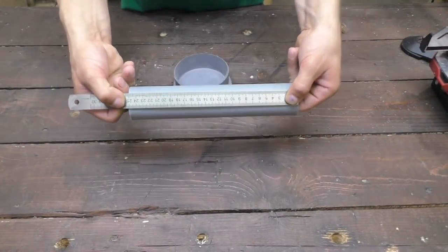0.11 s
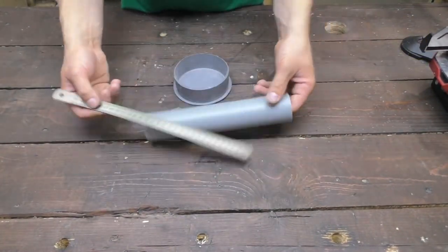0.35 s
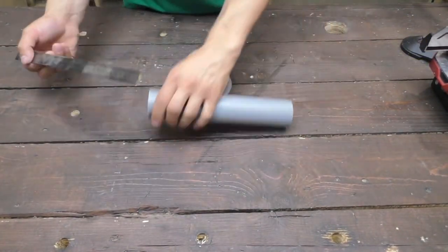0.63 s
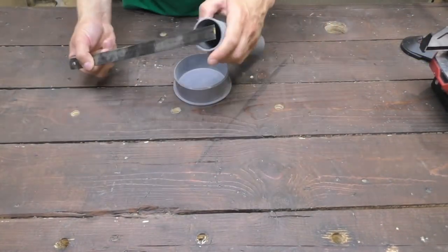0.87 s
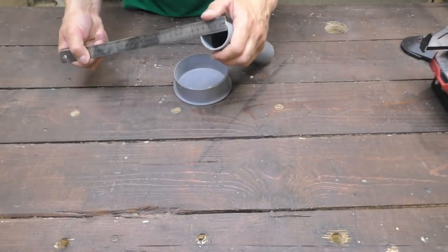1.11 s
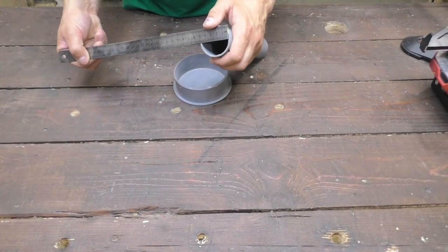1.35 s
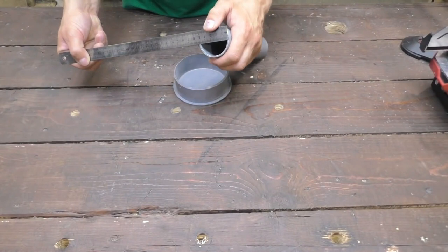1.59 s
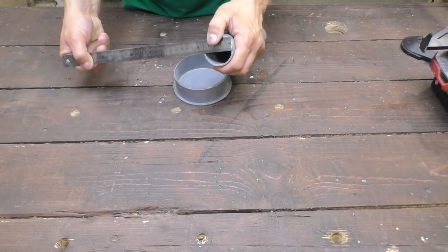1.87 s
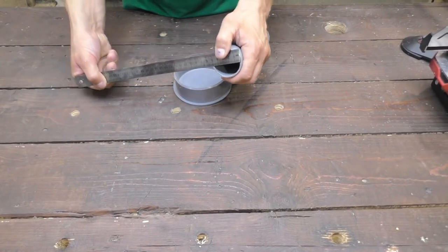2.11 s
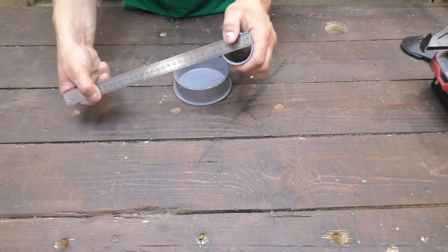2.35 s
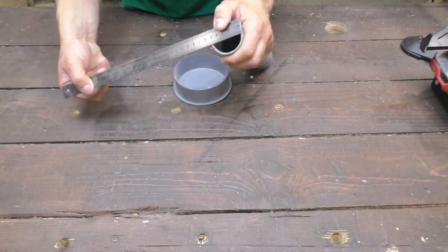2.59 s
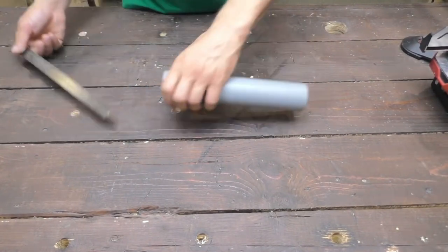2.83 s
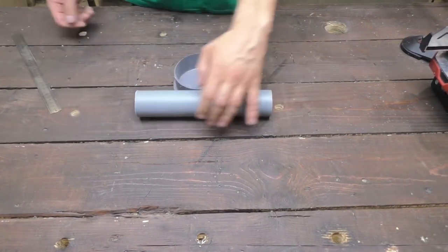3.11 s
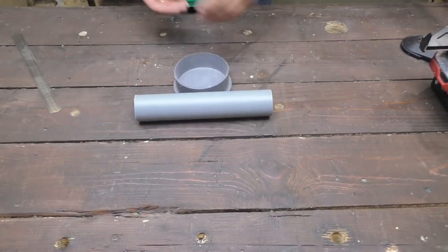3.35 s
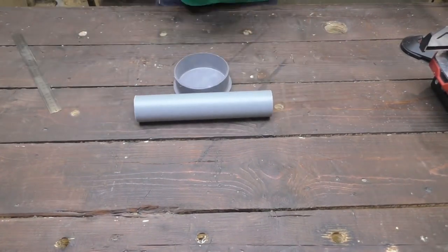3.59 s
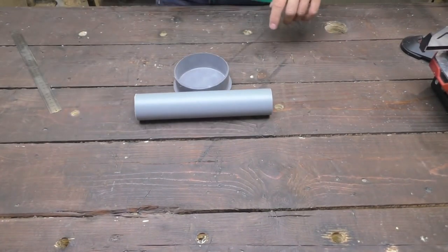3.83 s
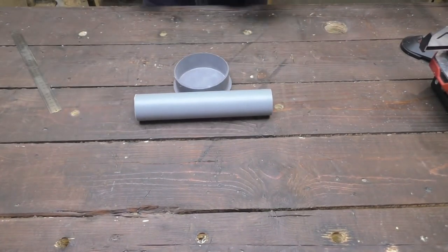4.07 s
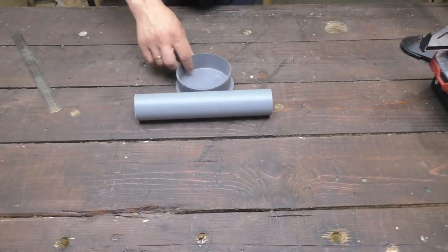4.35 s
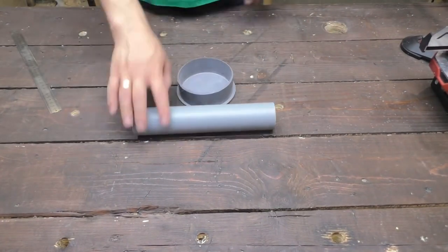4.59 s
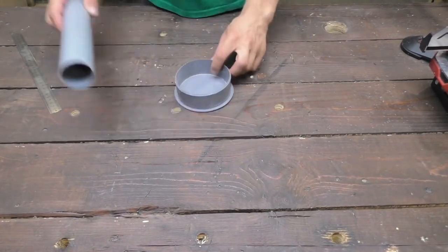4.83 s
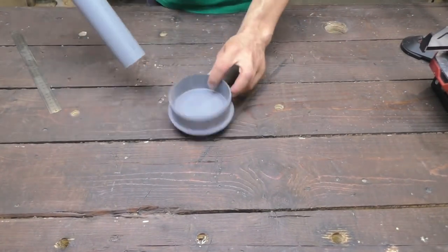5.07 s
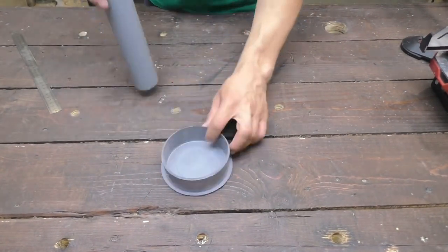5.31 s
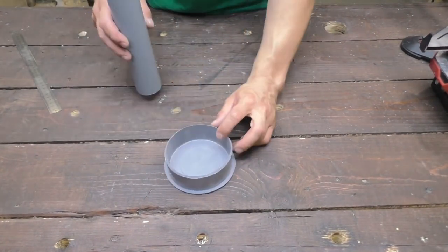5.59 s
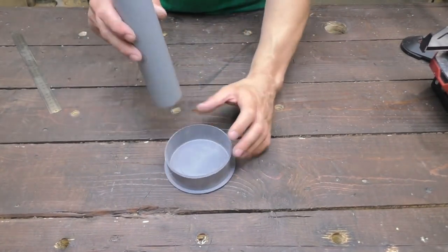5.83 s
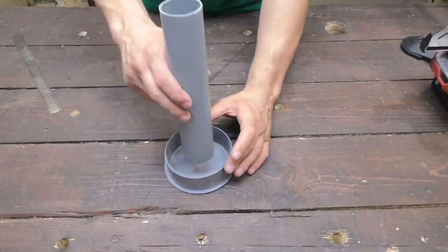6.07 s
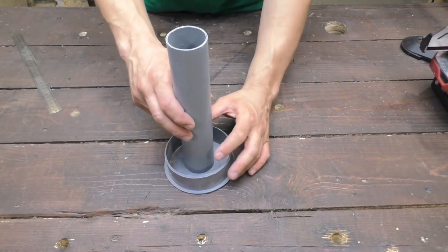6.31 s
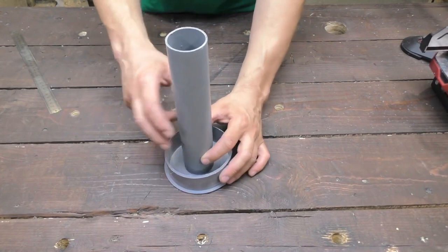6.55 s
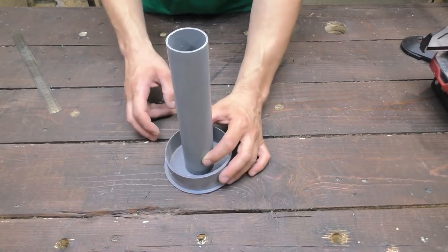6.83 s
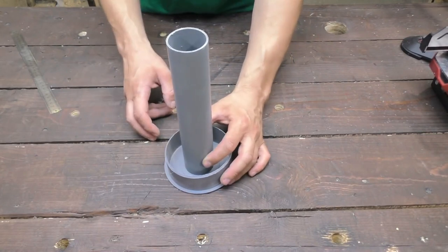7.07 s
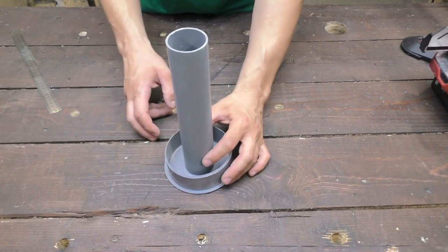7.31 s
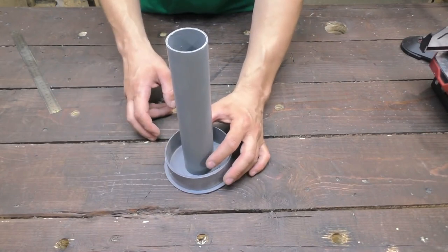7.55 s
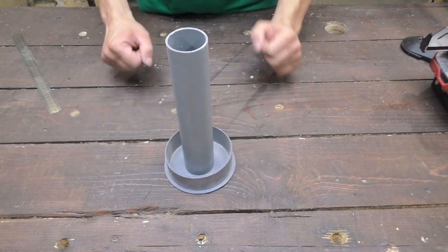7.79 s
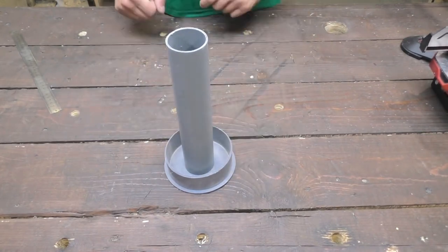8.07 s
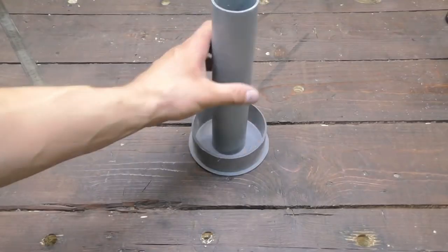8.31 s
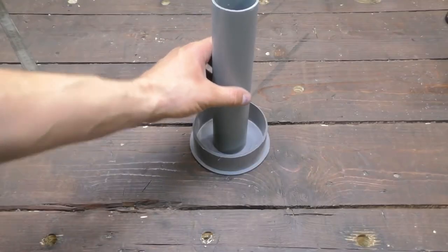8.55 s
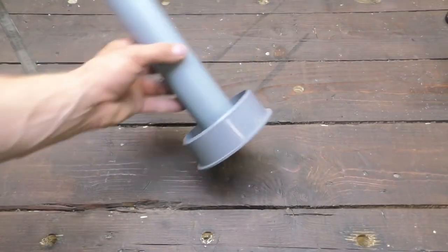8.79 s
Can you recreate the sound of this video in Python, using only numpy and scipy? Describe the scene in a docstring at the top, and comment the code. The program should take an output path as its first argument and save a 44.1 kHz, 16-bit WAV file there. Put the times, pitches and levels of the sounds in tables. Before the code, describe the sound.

Close stereo pickup of plastic pipe, cap and thin steel ruler handled on a plank table. A busy cluster of clicks, thuds and scrapes opens, then near quiet. The ruler is put down with a high metallic rustle, later the cap lands with loud hollow knocks and the pipe is set into it with a sharp clack. Faint handling ends over low room hum.

```python
"""In a workshop, a plastic pipe, a plastic cap and a steel ruler are handled on a plank table.
Blows ring the planks, the plastic and the trapped air as fading sines; rubbing is shaped noise of tiny slips.
The ruler sings high as it slides: random chatter keeps its ringing modes going. Walls add noise-like echoes.
Below lie soft room noise in bands and a few wavering hums; near the end the room noise changes colour,
most hums fade out and a deeper one enters."""
import sys
import numpy as np
from scipy import signal
from scipy.fft import rfft, irfft
from scipy.io import wavfile
from scipy.ndimage import uniform_filter1d

SR = 44100
rng = np.random.default_rng(int(sys.argv[2]) if len(sys.argv) > 2 else 0)


def volts_from_decibels(level):
    """Turn decibel levels (scalar or array-like) into linear amplitude factors."""
    exponent = np.asarray(level, float) / 20
    return 10 ** exponent


def int16_out(signal):
    """Quantize to a 16-bit WAV file."""
    q = np.round(np.clip(np.atleast_2d(signal).T, -1, 1) * 32767)
    wavfile.write(sys.argv[1], SR, q.astype(np.int16))


N = 393813


def rms_one(x):
    """Scale a sound to an average strength (rms) of 1."""
    return x / np.sqrt(np.mean(x ** 2) + 1e-20)


def in_time(rows):
    """Turn table columns into curves over all samples; the first column is the time in seconds."""
    s, *columns = np.transpose(rows)
    return [np.interp(np.arange(N) / SR, s, c) for c in columns]


def at_hz(points, hz):
    """Read a table between its points, with pitch on a logarithmic axis."""
    return np.interp(np.log(hz), np.log(np.array(points)[:, 0]), np.array(points)[:, 1])


def drift(rate):
    """Slow random wander of rms 1: noise smoothed twice, faster for a higher rate."""
    r = np.exp(-80 * np.pi * rate / SR)
    # computed at every 40th sample, after a run-in of 2000 points
    noise = rng.standard_normal(N // 40 + 2002)
    slow = signal.lfilter([1], [1, -2 * r, r * r], noise)[2000:]
    return np.interp(np.arange(N) / 40, np.arange(len(slow)), rms_one(slow))


def narrow(hz, width_hz, steady=0.64):
    """A wavering hum: a tone plus noise squeezed into a thin band around it; rms 1."""
    phase = 2 * np.pi * np.cumsum(np.broadcast_to(hz, N)) / SR
    return rms_one((drift(width_hz) + steady) * np.cos(phase) + drift(width_hz) * np.sin(phase))


def ring(clicks, hz, t60):
    """A resonance: a unit click starts a sine of height 1 that fades by 60 dB in t60 seconds."""
    r, w = volts_from_decibels(-60 / (t60 * SR)), 2 * np.pi * hz / SR
    return signal.lfilter([0, np.sin(w)], [1, -2 * r * np.cos(w), r * r], clicks + 1e-18)


def colour(x, spectrum):
    """Shape a sound by a spectrum that falls away beyond its ends; rms 1."""
    hz = np.maximum(np.arange(N // 2 + 1) * SR / N, 1)
    ends = [(spectrum[0][0] / 2, -60), *spectrum, (spectrum[-1][0] * 2, -60)]
    return rms_one(irfft(rfft(x) * volts_from_decibels(at_hz(ends, hz)), N))


def grains(per_s, spread_db):
    """Friction as random tiny slips of uneven size, pushing either way."""
    sizes = volts_from_decibels(spread_db * np.minimum(rng.exponential(1, N), 5)) * rng.choice([-1, 1], N)
    return sizes * (rng.random(N) < per_s / SR)


def strokes(s, swell_s, hold_s, fade_s, level_db):
    """Each stroke swells, holds and fades in dB; overlapping strokes add in power."""
    range_db = 20    # the swell and fade times span this much
    let_go_db = 24   # extra loss per swell or fade time beyond that, as the contact lifts off
    power, t = np.zeros(N), np.arange(N) / SR
    for at, swell, hold, fade, db in np.broadcast(s, swell_s, hold_s, fade_s, level_db):
        near = slice(max(int((at - 3 * swell) * SR), 0), int((at + hold + 3 * fade) * SR))
        before, after = (at - t[near]) / swell, (t[near] - at - hold) / fade
        away = np.maximum(np.maximum(before, after), 0)
        power[near] += volts_from_decibels(db - range_db * away - let_go_db * np.maximum(away - 1, 0)) ** 2
    return uniform_filter1d(np.sqrt(power), size=44)


# Colour of the room noise, early and late: pitch_hz [Hz], level_db [dB per Hz, relative]
EARLY_ROOM = [(12, -50), (20, -18.5), (102, -11), (160, -10), (195, -5.5), (237, -12), (258, -7), (382, -6),
              (452, -9.5), (583, -6.5), (1390, -25), (2580, -20), (8410, -29), (15200, -46.5), (16500, -51)]
LATE_ROOM = [(12, -40), (20, -19), (86, -6), (314, -4.5), (393, -5.5), (913, -22.5), (1390, -19),
             (2580, -18), (7730, -36), (15200, -40), (16500, -55)]
# How alike left and right are in the room: pitch_hz [Hz], likeness [0-1]
LIKENESS = [(30, 0), (130, 0.25), (290, 0.21), (640, 0.43), (1400, 0), (3100, 0.2), (6800, 0.02),
            (15000, 0.9)]
# Faint hums that fade out near the end: pitch_hz [Hz], width_hz [Hz], level_db [dB]
HUMS = [(115, 3.9, -73), (266, 9.2, -65), (338, 8.2, -69.5), (380, 4.5, -64.5), (560, 13, -70.5),
        (4040, 15, -73.5)]
# Low tone near 185 Hz: a wavering hum, joined from 4.5 s by planks ringing on after knocks:
# start_s [s], pitch_hz [Hz], level_db [dB]
LOW_TONE = [(0, 183.4, -66.5), (2.4, 183.7, -69.5), (2.8, 183.7, -69), (3.1, 180.5, -74), (4.4, 182, -79),
            (4.5, 185.2, -56), (5.6, 187.1, -66), (5.8, 194.6, -63), (7.0, 202, -64), (8.2, 188.2, -66.5),
            (8.93, 185.6, -63)]
# Deeper hum that enters near the end: pitch_hz [Hz], width_hz [Hz], level_db [dB]
DEEP_HUM = (79, 4.7, -58)
# Edges of the third-octave noise bands [Hz]
BAND_EDGES = np.minimum(20 * 2 ** np.arange(0, 10, 1 / 3), 17000)


def room():
    """Third-octave bands of stereo noise fade from one colour to another, with faint hums and a low tone."""
    early_db, late_db = -52.5, -50.5
    late = np.interp(np.arange(N) / SR, (8.2, 8.36), [0, np.pi / 2])   # crossfade start and end in s
    white, early_sum, late_sum = rng.standard_normal((2, 2, N)), 0, 0
    for k, (low, high) in enumerate(zip(BAND_EDGES, BAND_EDGES[1:])):
        band_filter = signal.butter(2, [low, high], "band", fs=SR, output="sos")
        mid, side = signal.sosfilt(band_filter, white[k % 2])   # neighbouring bands use separate noise
        hz = np.sqrt(low * high)
        alike = np.clip(at_hz(LIKENESS, hz), 0, 1)
        band = np.sqrt(1 + alike) * mid + np.sqrt(1 - alike) * side * [[1], [-1]]
        early_sum = early_sum + volts_from_decibels(at_hz(EARLY_ROOM, hz)) * band
        late_sum = late_sum + volts_from_decibels(at_hz(LATE_ROOM, hz)) * band
    hums = sum(volts_from_decibels(db) * narrow(hz, width) for hz, width, db in HUMS)
    low_hz, low_db = in_time(LOW_TONE)
    low_tone = volts_from_decibels(low_db) * narrow(low_hz, width_hz=2.14, steady=2.4)
    deep_hz, deep_width_hz, deep_db = DEEP_HUM
    deep_hum = volts_from_decibels(deep_db) * narrow(deep_hz, deep_width_hz, steady=4.6)
    early = volts_from_decibels(early_db) * rms_one(early_sum) + hums
    after = volts_from_decibels(late_db) * rms_one(late_sum) + deep_hum
    return np.cos(late) ** 2 * early + np.sin(late) ** 2 * after + low_tone


# Ringing modes of planks and plastic, for rubs and blows:
# pitch_hz [Hz], level_db [dB, relative], ring_s [s to fade 60 dB after a blow]
PLANK = [(199, -4, 0.06), (230, -2.5, 0.12), (288, 0.5, 0.18), (450, 3, 0.089), (596, 1, 0.092),
         (614.5, 2, 0.12), (690, -1, 0.1), (841.6, 5, 0.097), (1038, 1.5, 0.056)]
PLASTIC = [(1133, -10.5, 0.031), (1430, -11, 0.03), (1567, -10, 0.014), (2104, -8.5, 0.016),
           (2333, -0.5, 0.0088), (2570, -3, 0.0079), (3100, -3.5, 0.0067), (3710, -1, 0.0073),
           (4490, -7, 0.0096), (5120, -6.5, 0.012)]
# Rubbing strokes: loudest_s [s], swell_s [s], fade_s [s], scrape_db [dB], skin_db [dB]
RUBS = [(.37, 0.043, 0.083, -58, -57), (.41, 0.048, 0.026, -57, -49.5), (.487, .003, 0.021, -34, -38),
        (0.505, .003, 0.01, -34, -42), (.525, 0.059, 0.042, -36.5, -43),
        (0.713, 0.034, 0.077, -49.5, -47.5), (.795, .012, .05, -42, -51), (.813, .004, 0.048, -46, -45),
        (.887, .003, 0.022, -59, -48), (.912, .004, .02, -54, -52), (.97, 0.062, 0.054, -63, -60),
        (1.064, 0.0055, 0.026, -50.5, -65), (1.125, 0.028, 0.054, -58.5, -65), (1.3, .15, 0.12, -84, -68),
        (1.63, .05, .05, -88, -63.5), (1.76, 0.1, .04, -80, -63.5), (2.388, .03, 0.042, -54.5, -63),
        (2.624, 0.045, 0.032, -54.5, -64), (2.9, .003, 0.03, -35.5, -37), (3.045, .04, .04, -51.5, -70),
        (3.074, .003, 0.056, -42, -36), (3.115, .06, .004, -43.5, -46), (3.16, .08, .08, -57, -49),
        (3.216, 0.032, 0.061, -48, -45.5), (3.374, 0.058, 0.039, -51, -48.5), (3.44, .06, 0.035, -59, -61),
        (3.562, 0.061, 0.068, -59, -47), (3.86, 0.16, 0.045, -69, -66), (3.962, 0.096, 0.08, -53.5, -54.5),
        (4.272, 0.14, 0.13, -55.5, -56), (4.49, 0.0044, .015, -40.5, -46), (4.732, .012, 0.075, -47.5, -43),
        (4.8, 0.065, 0.21, -56.5, -60.5), (4.985, .07, 0.017, -55, -53), (5.004, 0.0028, 0.035, -40, -54),
        (5.05, 0.14, 0.11, -49.5, -49), (5.49, .005, 0.25, -72, -57), (5.778, 0.33, .2, -62.5, -65),
        (5.924, 0.011, 0.05, -56, -56), (6.6, 0.05, 0.054, -74, -63), (6.68, 0.044, 0.027, -62, -64),
        (7.424, .004, 0.063, -55, -65), (8.328, 0.059, 0.053, -62, -61), (8.43, 0.22, 0.21, -62.5, -61),
        (8.655, .14, .045, -45, -48.5), (8.826, 0.016, 0.074, -35, -48), (8.88, 0.044, 0.061, -58, -55)]
# Colours of scraping and of skin hiss: pitch_hz [Hz], level_db [dB per Hz, relative]
SCRAPE = [(650, -106), (1100, -35), (1250, -6.5), (1920, -3.5), (2660, 5.5), (5120, 5), (6500, -2),
          (8450, -40), (14300, -120)]
SKIN = [(2650, -71), (4500, -6), (4910, -7.5), (6840, -7), (15000, -12), (16100, -14), (16500, -55)]
# Dragging on the planks: full_s [s], swell_s [s], hold_s [s], fade_s [s], level_db [dB]
RUMBLES = [(0.49, .003, 0.043, 0.06, -34.5), (.7, .02, 0.074, 0.045, -56), (0.817, 0.049, .01, 0.059, -43),
           (2.604, 0.092, .01, 0.16, -55), (2.906, .003, .005, 0.083, -45),
           (3.044, .02, 0.028, 0.063, -47.5), (3.91, .013, .03, .15, -54.5),
           (4.484, .003, .003, 0.065, -39), (4.564, .02, .14, .05, -57), (4.72, .015, .003, 0.18, -46.5),
           (4.982, 0.022, 0.13, .15, -47), (5.415, 0.0034, 0.041, .02, -37),
           (5.466, .02, .003, 0.11, -26.5), (5.564, .02, .005, .19, -51.5),
           (6.281, 0.0027, .03, 0.065, -38)]


def rubbing():
    """Dense slips scrape and excite the plastic, skin hisses on it, and the planks rumble in their modes."""
    s, swell, fade, scrape_db, skin_db = np.transpose(RUBS)
    scrape = strokes(s, swell, 0, fade, scrape_db)
    faint = volts_from_decibels(-78.5 + 5.5 * drift(11))   # a faint hiss of randomly wandering level
    hiss_level = strokes(s, swell, 0, fade, skin_db) + faint
    slips = grains(per_s=6000, spread_db=3.0) * volts_from_decibels(2.2 * drift(46))
    # under rubbing the planks ring shorter and the plastic longer than after a blow
    planks = sum(volts_from_decibels(db) * ring(slips, hz, 0.16 * t60) for hz, db, t60 in PLANK)
    plastic = sum(volts_from_decibels(db) * ring(slips, hz, 1.4 * t60) for hz, db, t60 in PLASTIC[3:])
    rasp = rms_one(colour(slips, SCRAPE) + volts_from_decibels(-6.5) * rms_one(plastic))
    hiss = colour(grains(per_s=15000, spread_db=2.5) * volts_from_decibels(1.2 * drift(30)), SKIN)
    rumble = strokes(*np.transpose(RUMBLES)) * rms_one(planks)
    return scrape * rasp + hiss_level * hiss + rumble


# How long echoes last: pitch_hz [Hz], fade_s [s to fade 60 dB]
ECHO_FADE = [(200, 0.37), (1000, 0.13), (4000, 0.25), (12000, 0.099)]


def echoes(x):
    """Walls return noise-like tails with their own fade time in each band, partly unlike left and right."""
    t, out = np.arange(SR // 2) / SR, 0
    for low in 100 * 2. ** np.arange(7):
        band = signal.butter(2, [low, min(2.4 * low, 17000)], "band", fs=SR, output="sos")
        tail = signal.sosfilt(band, rng.standard_normal((2, len(t))))
        fade = volts_from_decibels(-60 * t / at_hz(ECHO_FADE, 2.28 * low))
        onset = np.clip(t / 0.0011 - .5, 0, 1)   # a brief gap, then a quick rise
        out = out + tail * fade * onset
    mid, side = out / np.sqrt(np.sum(out[0] ** 2))
    # bass and treble arrive alike on both sides
    side_band = signal.butter(2, [350, 7000], "band", fs=SR, output="sos")
    side = volts_from_decibels(-3.5) * signal.sosfilt(side_band, side)
    return signal.fftconvolve(x[None], [mid + side, mid - side])[:, :N]


def struck(modes, s, pitch_hz, level_db, narrow_db, scatter_db, rise_s):
    """Each blow rings every mode, strongest near the struck spot's pitch, neighbours in opposite phase."""
    out, t = np.zeros(N), np.arange(SR // 3) / SR
    hz, mode_db, t60 = np.transpose(modes)[:, :, None]
    luck = rng.normal(0, 1, (len(s), len(modes), 1))
    signs = (-1.) ** np.arange(len(modes))[:, None]
    rise = 1 - np.exp(-t / rise_s)
    rings = signs * volts_from_decibels(mode_db - 60 * t / t60) * np.sin(2 * np.pi * hz * t) * rise
    for k, start in enumerate(s):
        at = round(start * SR)
        octaves_off = np.abs(np.log2(hz / pitch_hz[k]))
        strength_db = level_db[k] - narrow_db * octaves_off + scatter_db * luck[k]
        out[at:at + len(t)] += (volts_from_decibels(strength_db) * rings).sum(axis=0)[:N - at]
    return out


def crunch(x, length_s, spread_db):
    """A rough contact closes in a few tiny steps: the first touch and a quick crumble after it."""
    t = np.arange(400) / SR
    chosen = rng.random(len(t)) < .12
    steps = rng.normal(0, 1, len(t)) * chosen * volts_from_decibels(spread_db - 60 * t / length_s)
    return x + signal.fftconvolve(x, steps)[:N]


# Knocks on the planks: start_s [s], level_db [dB, before mode levels and luck], pitch_hz [Hz, struck spot]
THUDS = [(.417, -56, 374), (.4625, -26.5, 560), (.4841, -37.5, 300), (.5051, -35, 800), (.5211, -40, 586),
         (.5289, -32, 690), (.6942, -49, 237), (.711, -44, 290), (.7853, -37.5, 278), (.8098, -31, 288),
         (1.055, -31, 500), (2.087, -50.5, 304), (2.5786, -42.5, 284), (2.6104, -51, 452),
         (2.8962, -50, 756), (3.027, -46.5, 310), (3.0354, -46, 245), (3.0718, -45, 830), (3.1, -44, 298),
         (4.2634, -53, 380), (4.4783, -40.5, 511), (4.7171, -34, 241), (4.757, -38.5, 220),
         (5.0123, -47, 260), (5.1203, -41.5, 450), (5.4111, -39, 785), (5.4209, -33.5, 580),
         (5.464, -31, 690), (5.4752, -35, 710), (5.4805, -29, 705), (5.6994, -45, 296), (6.274, -30, 450),
         (6.292, -37, 288), (8.3138, -46.5, 200), (8.5282, -45, 196)]
# Clicks on the plastic: start_s [s], ring_db [dB], hardness [0-1], snap_db [dB]
# (both levels before mode levels and luck)
CLICKS = [(.39, -40, 0.65, -51), (0.418, -46, .8, -47), (0.4624, -23, .52, -32), (0.4838, -24, 0.1, -21),
          (0.5055, -19.5, 0.52, -17.5), (.5211, -28, 0.3, -19), (0.5295, -27, 0.4, -24),
          (0.6945, -46, 0.4, -42), (.711, -43, 0.4, -38), (.757, -38, 0.9, -39), (.7853, -45, 0.4, -47),
          (.8098, -28.5, 0.62, -35), (.883, -29, 0.9, -22), (.9077, -33, 1, -44), (1.054, -36.5, 0.3, -42),
          (2.5786, -41.5, 0.46, -47), (2.61, -41, .5, -52), (2.8954, -29.5, 0.4, -37),
          (3.027, -48, .6, -50), (3.0346, -48, .8, -46), (3.0719, -26, 1, -24),
          (3.1096, -20.5, 0.92, -17.5), (3.3662, -34.5, 0.63, -50), (3.5228, -41, 0.8, -32),
          (4.2627, -54, .9, -48), (4.4784, -20.5, 0.44, -34.5), (4.7171, -42, .5, -51),
          (5.0017, -29.5, 0.64, -40), (5.12, -32, 0.2, -62), (5.299, -51, .6, -52),
          (5.4117, -11.5, 0.65, -25.5), (5.4207, -21, 0.53, -32), (5.464, -12, 0.5, -18),
          (5.4807, -22.5, .3, -42), (5.922, -59, .99, -46), (6.274, -10, 0.94, -9.5),
          (7.426, -41, 0.85, -45.5), (8.802, -69, 0.4, -48), (8.828, -33, 0.85, -42),
          (8.8547, -24.5, 0.2, -44)]
# Modes of the snapping contact: pitch_hz [Hz], level_db [dB, relative], ring_s [s to fade 60 dB]
SNAP = [(5740, 8.5, 0.0016), (7240, -2, 0.0032), (8950, 1.5, 0.0018), (11440, -5.5, 0.0018),
        (14200, -2, 0.0012)]


def blows():
    """The planks thud, the plastic clicks higher the harder the contact, and the contact itself snaps."""
    thud_s, thud_db, spot_hz = np.transpose(THUDS)
    s, ring_db, hardness, snap_db = np.transpose(CLICKS)
    plastic_hz = 1200 * 4 ** np.clip(hardness, 0, 1)
    thud = struck(PLANK, thud_s, spot_hz, thud_db, narrow_db=9.0, scatter_db=3.0, rise_s=0.00033)
    click = struck(PLASTIC, s, plastic_hz, ring_db, narrow_db=10.0, scatter_db=3.5, rise_s=0.000083)
    snap = struck(SNAP, s, 3.0 * plastic_hz, snap_db, narrow_db=1.5, scatter_db=2.0, rise_s=.0001)
    return thud + click + crunch(snap, length_s=.009, spread_db=-7.0)


# Ringing modes of the steel ruler: pitch_hz [Hz], level_db [dB, relative], ring_s [s to fade 60 dB]
STEEL = [(9390, -13, .03), (11400, -14, .03), (12400, -15, .03), (13300, -3, .012), (13667, -2, .045),
         (13900, -2, .015), (14200, -5, .015), (14520, -4, .035), (14880, -1, .035), (15042, -2, .04),
         (15300, -4, .015), (15533, -2, .035), (15750, -4, .015)]
# Ruler sliding: full_s [s], swell_s [s], hold_s [s], fade_s [s], level_db [dB]
SLIDES = [(0.416, 0.03, .006, .008, -32), (0.48, .002, .002, 0.026, -33), (2.897, .003, .016, .033, -42),
          (3.07, .002, .03, .02, -33), (3.108, 0.025, 0.0055, .008, -23), (3.128, .01, .037, .015, -31),
          (3.172, .01, 0.054, .02, -37)]


def ruler():
    """The thin steel strip chatters as it slides and keeps its high modes ringing."""
    chatter = grains(per_s=5100, spread_db=3.5) * volts_from_decibels(3.2 * drift(50))
    push = strokes(*np.transpose(SLIDES))
    drives = [volts_from_decibels(db) * chatter * rng.normal(0, 1, N) for hz, db, t60 in STEEL]
    # the ringing under a constant push sets the level
    steady = sum(ring(drive, hz, t60) for drive, (hz, db, t60) in zip(drives, STEEL))
    song = sum(ring(push * drive, hz, t60) for drive, (hz, db, t60) in zip(drives, STEEL))
    return song / np.std(steady)


# Air trapped in pipe or cap: start_s [s], level_db [dB], pitch_hz [Hz], ring_s [s to fade 60 dB]
HOLLOW = [(.4625, -27, 623, 0.11), (.884, -48, 1280, .06), (.909, -50, 1260, .05), (3.099, -25, 280, 0.024),
          (5.1201, -28.5, 443, 0.11), (5.4115, -9.5, 2070, 0.0091), (5.4645, -17.5, 671, 0.095),
          (5.4645, -26.5, 1626, 0.081), (6.275, -23.5, 1020, .03), (6.275, -12, 2290, 0.017)]


def hollow():
    """A short push of one and a half cycles makes the trapped air ring one note."""
    out = np.zeros(N)
    for s, db, hz, t60 in HOLLOW:
        t = np.arange(round(1.5 * SR / hz)) / SR
        push = np.zeros(N)
        cycles = np.hanning(len(t)) * np.sin(2 * np.pi * hz * t)
        push[round(s * SR) + np.arange(len(t))] = 4 / len(t) * cycles
        out += volts_from_decibels(db) * ring(push, hz, t60)
    return out


def scene():
    """The table sits almost in the middle and radiates no deep bass; walls and room noise give width."""
    table = blows() + hollow() + rubbing() + ruler()
    no_bass = signal.butter(6, 165, "high", fs=SR, output="sos")
    table = signal.sosfilt(no_bass, table)
    direct = table * volts_from_decibels(np.array([[-.2], [.2]]))   # left and right in dB
    return direct + volts_from_decibels(-11.5) * echoes(table) + room()


def band_limit(x):
    """A steep low-pass at the top of the band."""
    return signal.sosfilt(signal.butter(12, 17040, fs=SR, output="sos"), x)


def record(dry):
    """A steep filter cuts the very top of the treble."""
    top = signal.cheby2(10, 35, 16350, fs=SR, output="sos")
    mix = signal.sosfilt(top, dry)
    return band_limit(mix)


dry = scene()
out = record(dry)
int16_out(out)
```